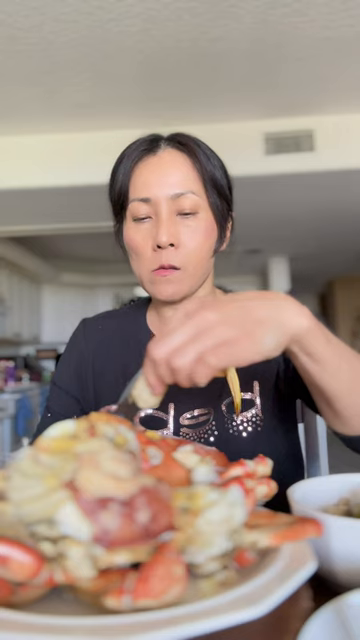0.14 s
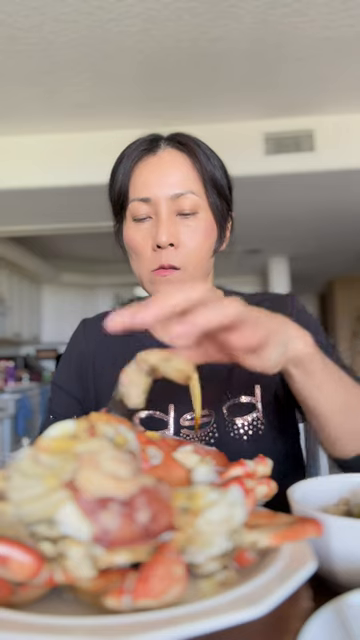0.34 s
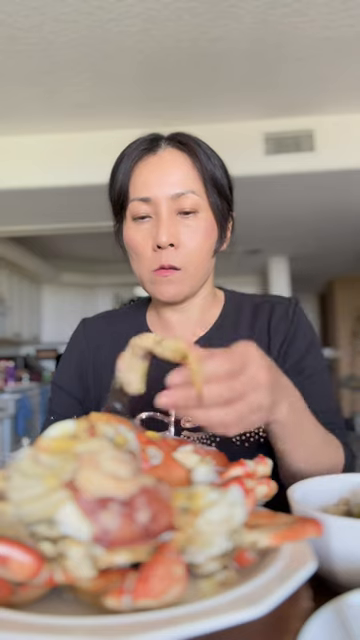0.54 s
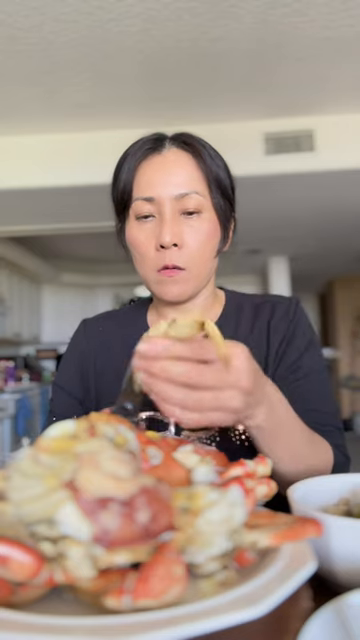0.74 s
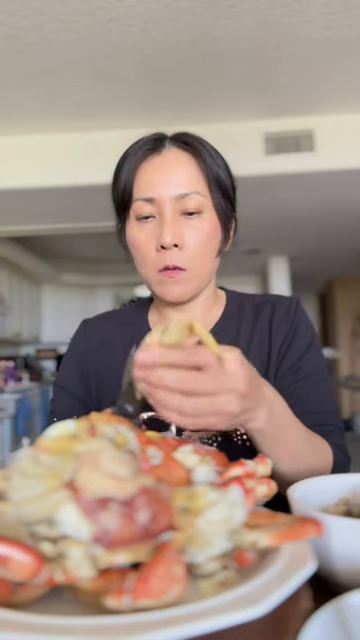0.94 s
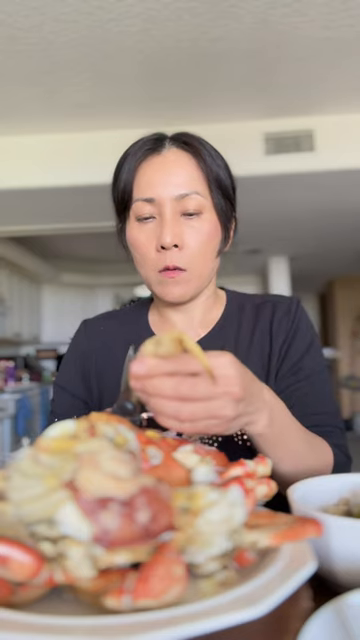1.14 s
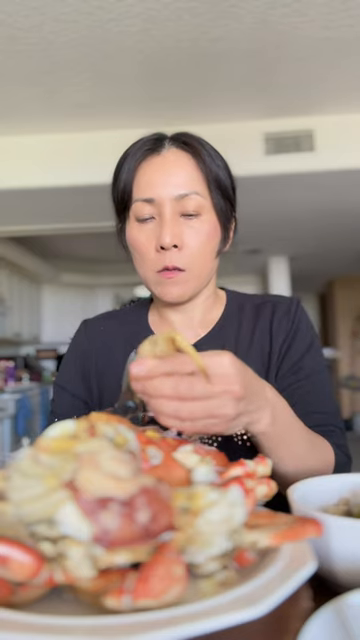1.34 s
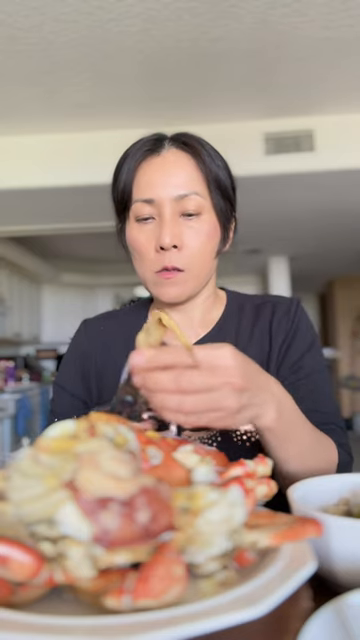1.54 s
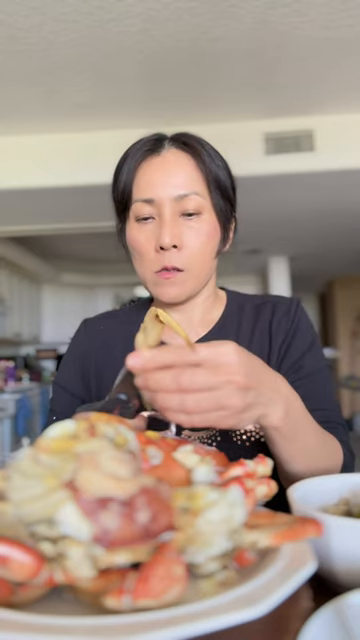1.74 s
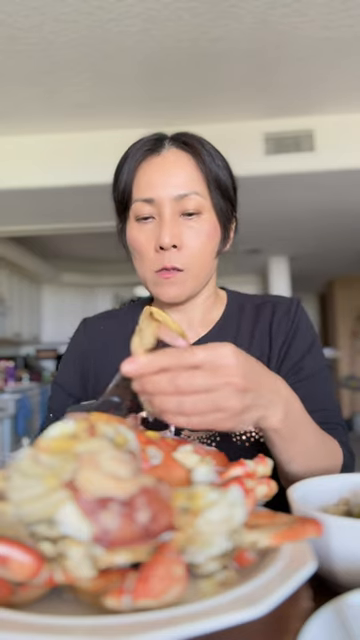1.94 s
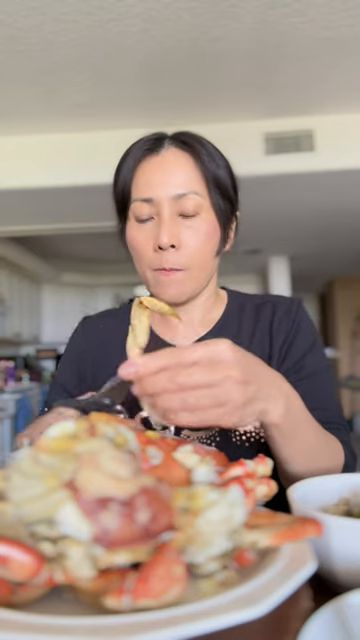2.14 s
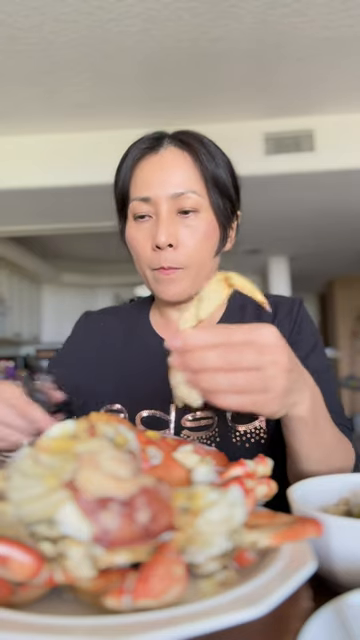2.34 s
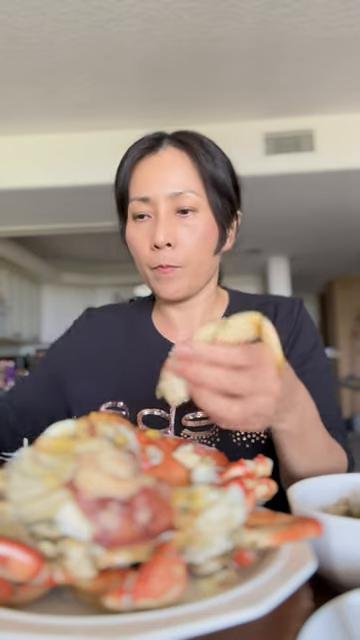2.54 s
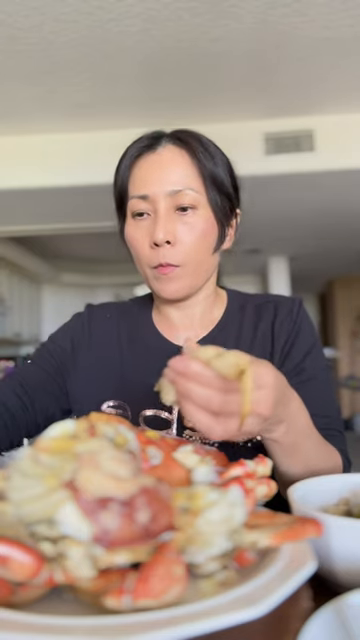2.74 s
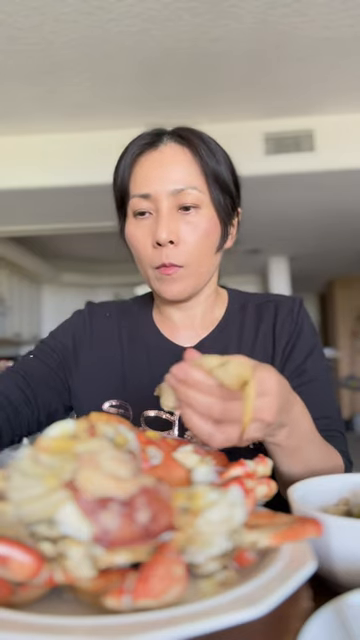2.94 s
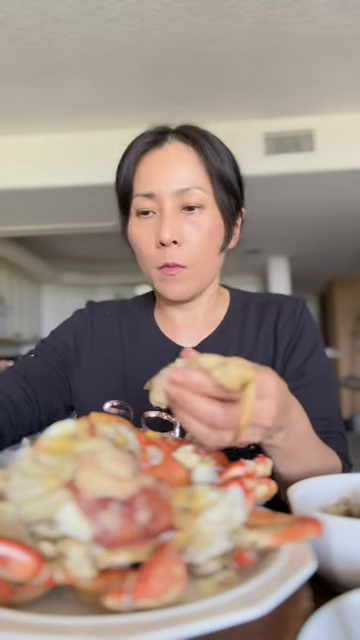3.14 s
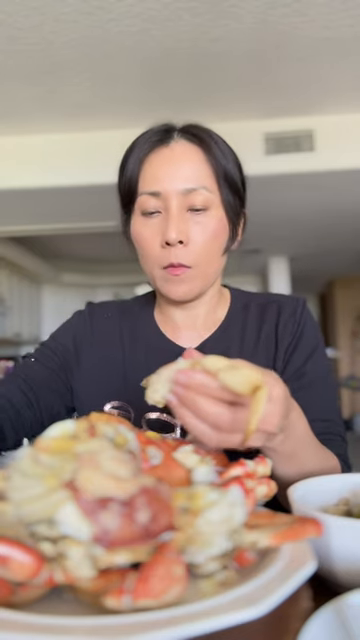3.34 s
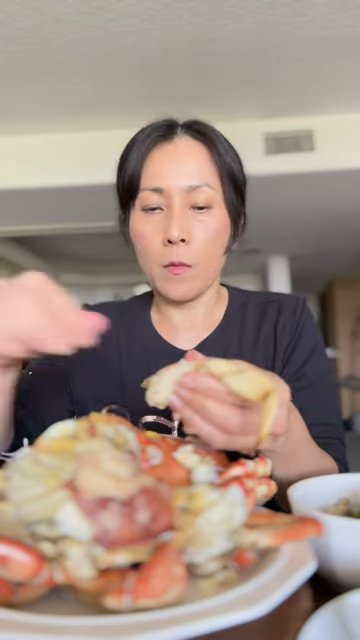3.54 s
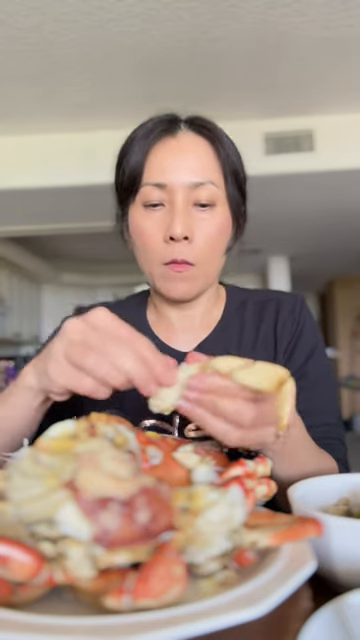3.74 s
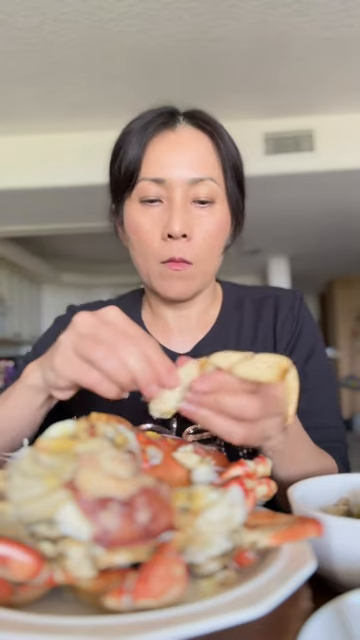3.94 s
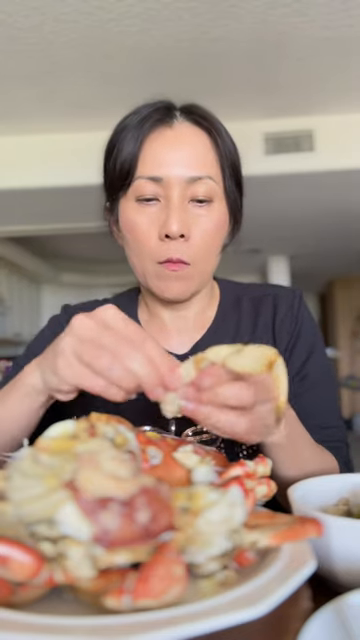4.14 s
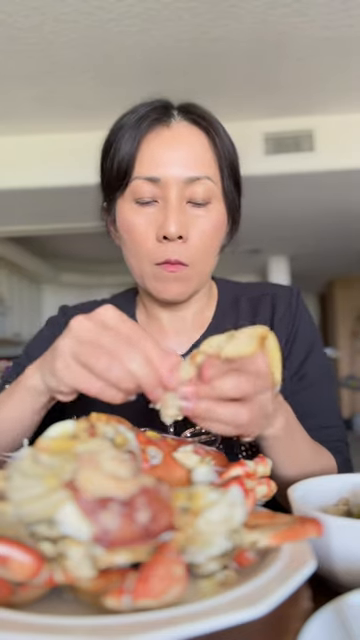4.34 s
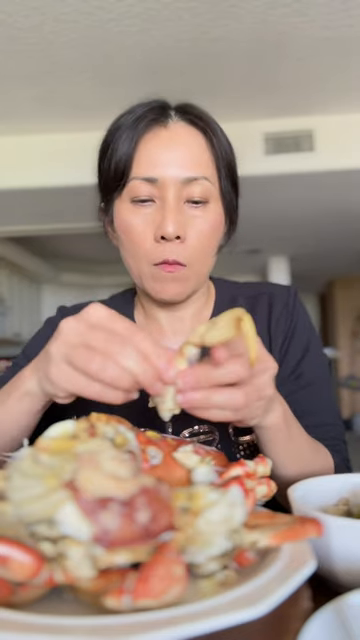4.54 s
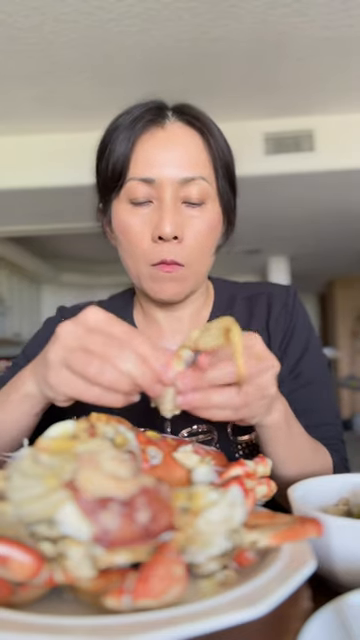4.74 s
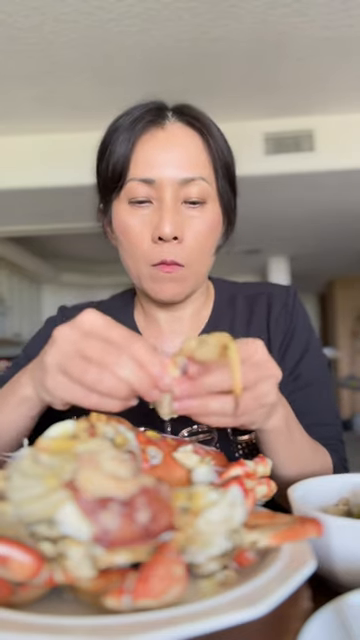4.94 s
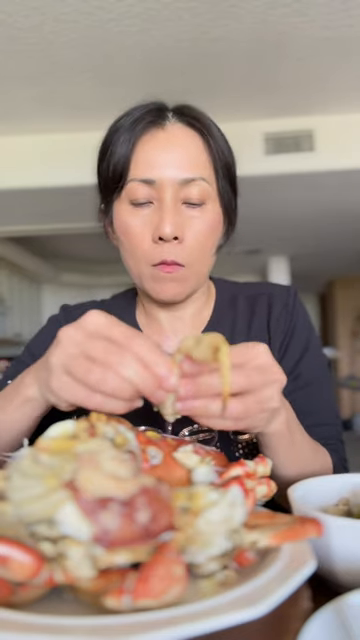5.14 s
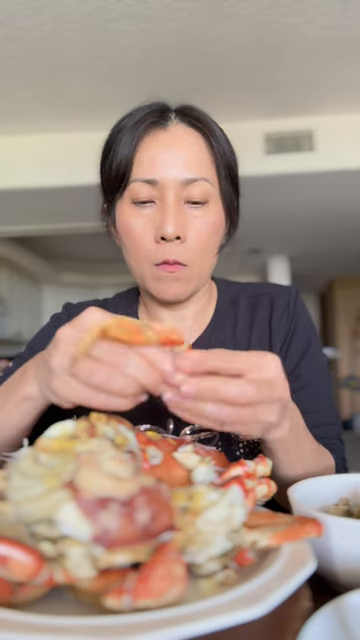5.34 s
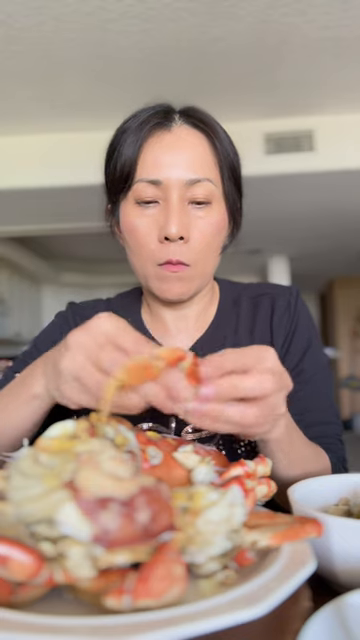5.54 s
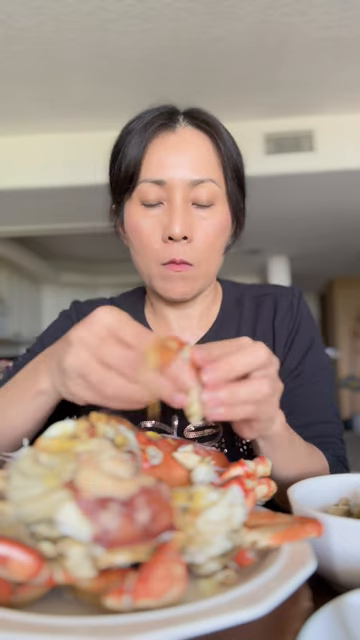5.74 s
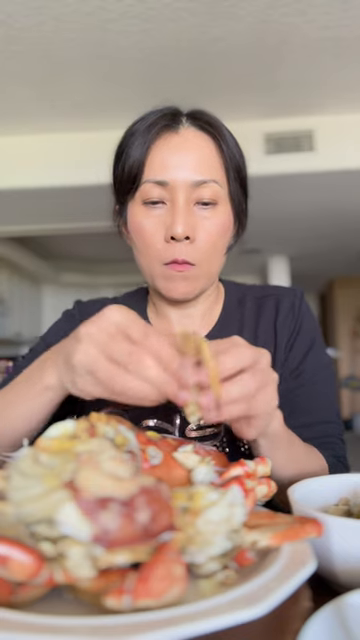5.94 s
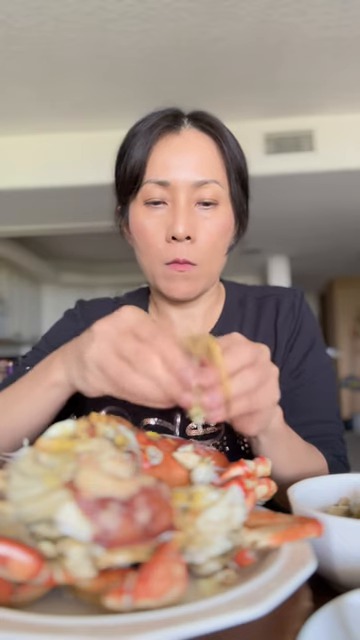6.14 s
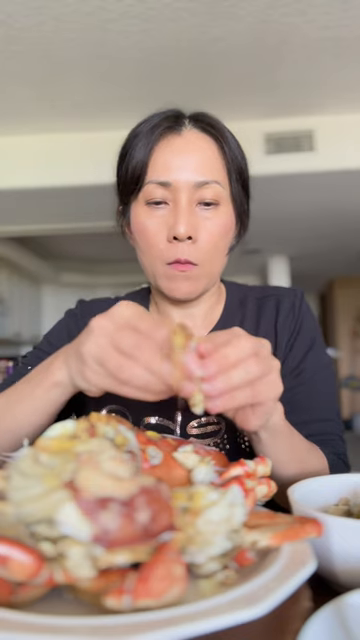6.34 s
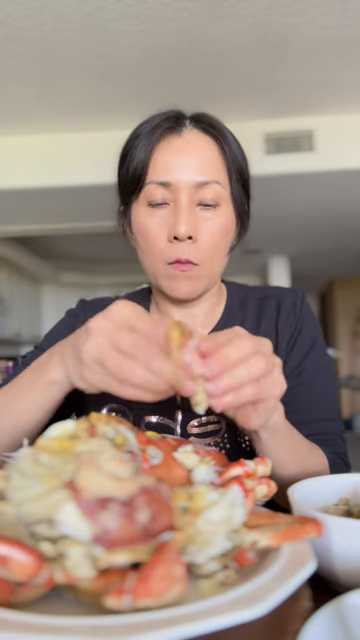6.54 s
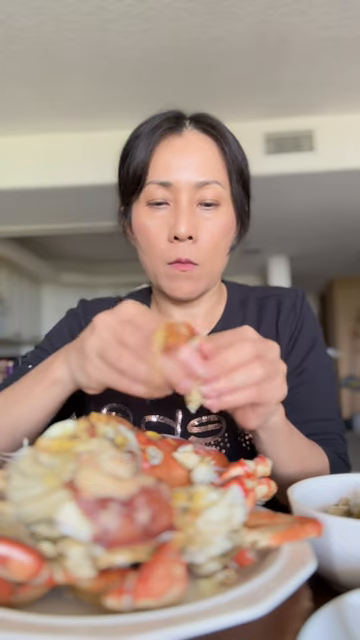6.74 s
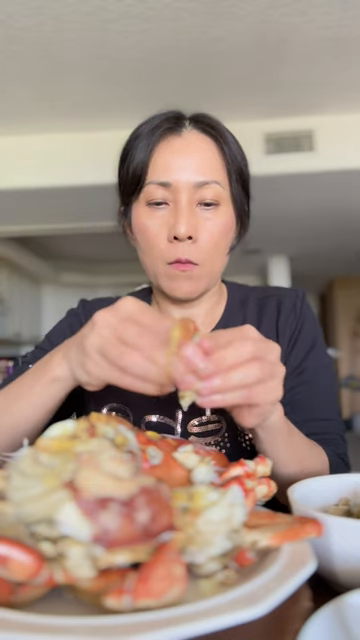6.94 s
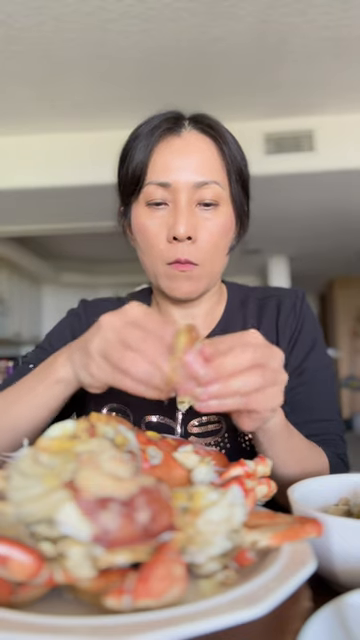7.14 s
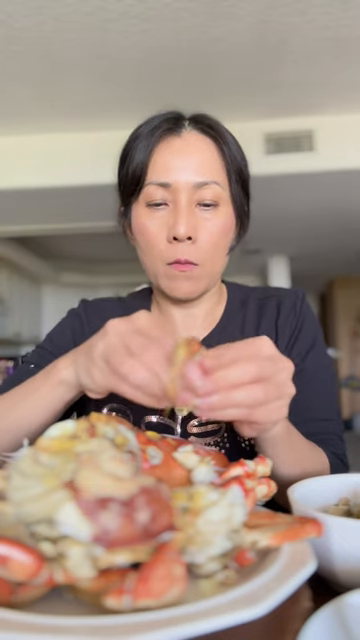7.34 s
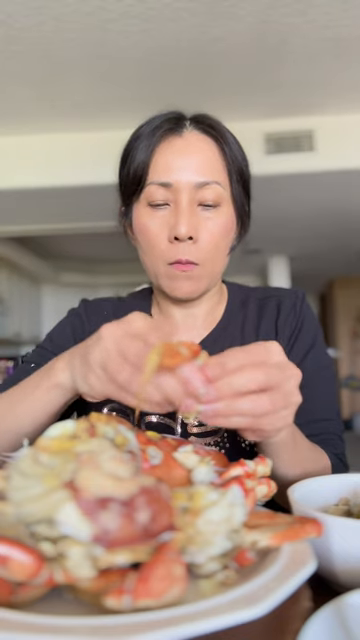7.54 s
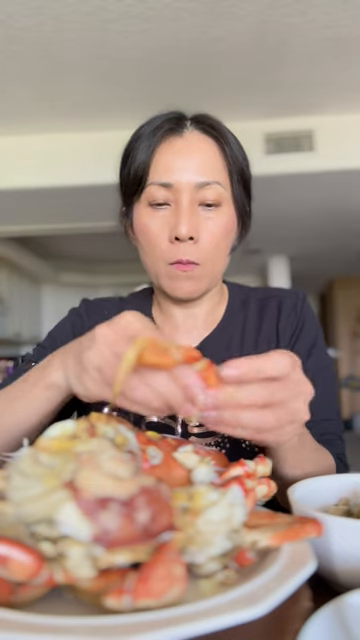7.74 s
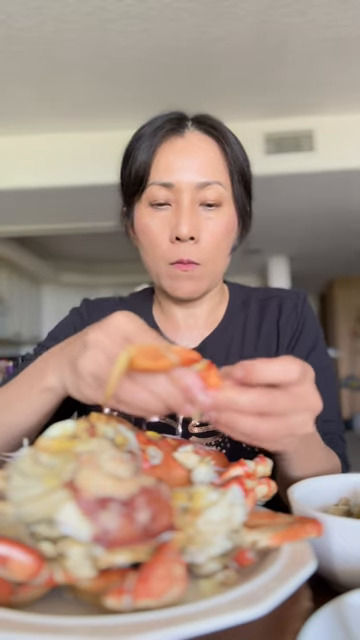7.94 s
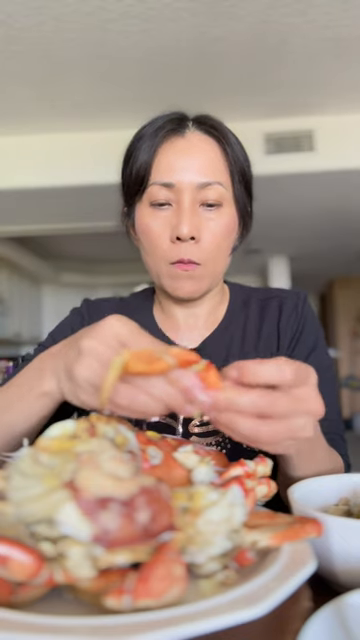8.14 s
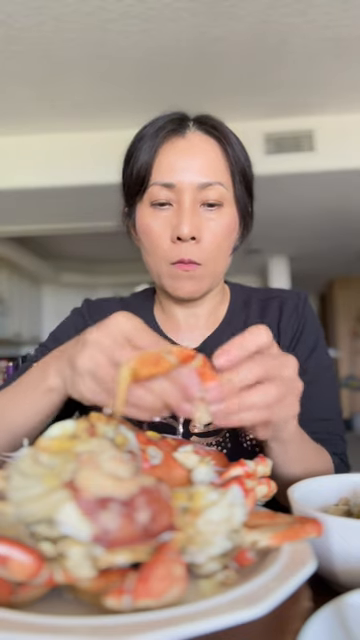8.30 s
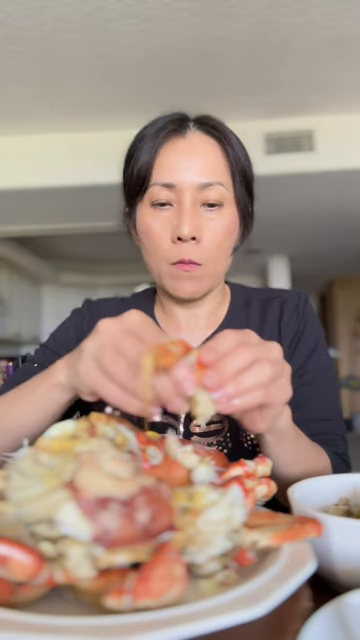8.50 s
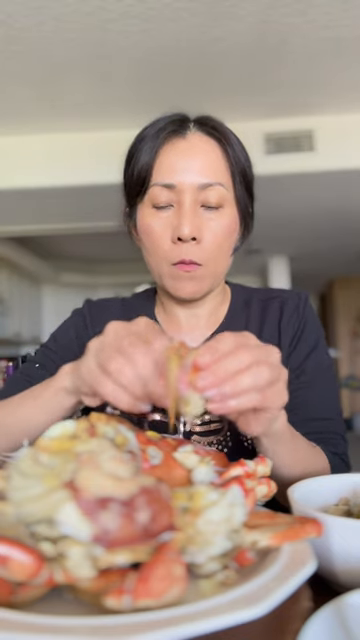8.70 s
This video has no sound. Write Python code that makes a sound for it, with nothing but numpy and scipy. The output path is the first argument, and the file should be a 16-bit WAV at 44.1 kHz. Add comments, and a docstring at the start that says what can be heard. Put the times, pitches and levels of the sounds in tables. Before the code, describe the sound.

Close to the microphone, hands break a crab leg in short, brittle snaps, with faint wet rubbing of fingers on the shell. About three seconds in, steel kitchen shears are laid on a wooden table with two ringing clatters. The cracking resumes, with two louder clusters of snaps and small crackles between them. The room is a quiet home with a low hush and a faint, distant fridge hum.

```python
"""A dining table in a quiet home, close to a phone: hands crack a crab leg and pull it apart.
Each brittle fracture is a short noise burst, coloured by the piece of shell it frees; sliding
fingers add friction noise and faint crackle. Steel kitchen shears are laid down twice at the left,
and each bounce excites the modes of the blades and the wooden table. The room reverberates
briefly, and a fridge hums far off under its hush."""
import sys
import numpy as np
from scipy import signal
from scipy.fft import rfft, irfft
from scipy.io import wavfile
from scipy.ndimage import uniform_filter1d

SR = 44100
rng = np.random.default_rng(int(sys.argv[2]) if len(sys.argv) > 2 else 0)


def to_wav(s):
    """Save 16-bit WAV."""
    ch = np.atleast_2d(s).T  # columns
    pcm = np.round(np.clip(ch, -1, 1) * 32767)  # PCM
    wavfile.write(sys.argv[1], SR, pcm.astype(np.int16))


N = 391166

# spectrum of the room's hush: (frequency [Hz], relative density [dB])
HUSH_SPECTRUM = [(12, -36.5), (20, -11.5), (53, 1.5), (143, -3.5), (361, -14), (492, -22.5), (772, -19.5),
                 (913, -23), (1470, -36), (2890, -34), (3720, -34), (5500, -43.5), (9000, -46),
                 (13500, -45), (16500, -59)]
# likeness of left and right in far sound: (frequency [Hz], coherence [0-1])
COHERENCE = [(30, 1), (60, .95), (130, .88), (290, .8), (640, .6), (1400, .15), (3000, .25), (15000, .1)]
# partials of the fridge: (frequency [Hz], mean level [dB])
FRIDGE_PARTIALS = [(59.2, -66), (118.4, -70.5), (226.1, -78), (769.8, -84), (1066, -91), (1184, -92.5)]
# fingers sliding on wet shell: (time [s], level [dB], relative treble [dB], duration [s])
SLIDES = [(-0.003, -58.5, 27, .14), (0.169, -64.5, 4, .15), (0.286, -71.5, -14, 0.12),
          (0.645, -70, 0.5, 0.1), (.747, -75.5, -5, 0.092), (0.931, -68.5, 2, 0.06),
          (1.289, -77.5, 12, 0.045), (1.402, -59.5, 4, 0.039), (1.562, -57.5, -4, 0.06),
          (1.821, -63, 5.5, 0.072), (2.178, -67.5, -10.5, 0.096), (2.476, -76, -12, 0.072),
          (2.732, -76, -1.5, 0.054), (3.869, -78.5, -2.5, 0.087), (3.988, -78, -13.5, 0.036),
          (4.066, -81, -6, 0.09), (4.209, -81.5, -3, 0.05), (4.371, -85.5, -6, 0.043),
          (4.696, -63.5, -22, 0.05), (5.196, -64.5, 1, 0.12), (5.477, -81, -17, 0.066),
          (5.584, -95, -17, .12), (5.855, -86, -10.5, 0.16), (6.018, -88, -14.5, .1),
          (6.144, -62.5, 6.5, 0.034), (6.68, -76, -12, 0.032), (6.773, -72.5, -8, 0.063),
          (7.187, -74, -16.5, 0.086), (7.294, -46.5, -25, 0.12), (7.629, -53, -25, .072),
          (7.91, -86.5, 5, .05), (7.998, -95, 1, .044), (8.25, -77.5, -19.5, 0.026),
          (8.515, -67, -21, 0.044), (8.61, -69.5, -2, 0.041), (8.754, -71, -6, 0.078)]
# spectrum of the rubbing: (frequency [Hz], relative density [dB])
FRICTION_SPECTRUM = [(800, -25), (2000, -5), (3700, 0), (6000, -5), (8000, -11), (11000, -11), (16000, -14)]
# distinct shell fractures:
# (time [s], level [dB], resonance [Hz], relative treble [dB], relative body [dB], T60 [s])
FRACTURES = [(0.0144, -33.5, 5250, 1, -25, 0.014), (0.0328, -31.5, 5000, 10.5, -30, 0.011),
             (0.0403, -36, 5670, -36, -31, 0.0076), (0.0444, -33, 5600, -22, -20, 0.03),
             (0.1042, -41.5, 4800, 7, -33, 0.029), (0.1261, -44, 5410, 8, -22, 0.012),
             (0.1531, -24.5, 5250, 4, -19.5, 0.022), (0.2074, -24, 3780, 5.5, -17.5, 0.03),
             (0.2154, -17, 3370, -7.5, -21.5, 0.014), (0.2234, -28.5, 2430, -41, -29, 0.0045),
             (0.6419, -40.5, 4150, -25, -11, 0.015), (0.6664, -58, 3980, -14, -20, 0.01),
             (0.7103, -50.5, 2680, -20, -7, 0.01), (0.7652, -45.5, 2130, -21, -13, 0.0081),
             (0.7984, -53.5, 5030, -29, -7, 0.011), (0.9258, -51, 2200, -17, -16, 0.01),
             (0.9537, -47.5, 2100, -25, -22, 0.0089), (1.2446, -56, 5340, 10, -23, 0.013),
             (1.2989, -40.5, 5400, 1, -37, 0.0072), (1.4142, -41.5, 2970, 11.5, -9, 0.021),
             (1.4294, -53, 2780, 8, -9, 0.01), (1.4591, -24.5, 2310, 6, -12.5, 0.024),
             (1.4894, -38, 2720, 3, -31, 0.01), (1.5703, -36.5, 4830, 3, -22, 0.012),
             (1.5938, -28, 2310, 3.5, -13, 0.018), (1.6944, -44.5, 4060, 5, -19, 0.01),
             (1.707, -43, 2300, -26, -35, 0.015), (1.8327, -37.5, 2270, 3, -16, 0.026),
             (1.8494, -39.5, 2440, -36, -12, 0.013), (1.8876, -47, 2350, 9, -27, 0.017),
             (2.0173, -43.5, 4130, 1, -43, 0.01), (2.1311, -51, 4170, -11, -16, 0.022),
             (2.1595, -25, 4700, -6, -21, 0.013), (2.2383, -43.5, 2430, 3, -18.5, 0.0079),
             (2.7422, -62.5, 3515, -12, -10.5, 0.01), (3.5987, -55, 3910, -22, -13, 0.011),
             (4.088, -55, 3750, -12, -19, 0.008), (4.1135, -50, 3030, 4, -29.5, 0.0094),
             (4.143, -52.5, 3080, -25, -32, 0.012), (4.1514, -51, 5470, -26, -31, 0.013),
             (4.4343, -44.5, 3430, -4, -43, 0.014), (4.7177, -27.5, 4100, -8, -18.5, 0.014),
             (4.8633, -38.5, 4120, 0, -17.5, 0.012), (5.0335, -54.5, 4100, 1, -23, 0.01),
             (5.0913, -31.5, 3300, 2.5, -20, 0.016), (5.1094, -48, 4450, -1, -13, 0.0083),
             (5.1228, -27, 3090, 4, -18.5, 0.015), (5.1432, -19.5, 4180, 2.5, -29, 0.012),
             (5.1624, -37, 4620, -21, -37, 0.01), (5.2284, -66, 4080, 7, -12, 0.01),
             (5.2594, -7.5, 5440, 0, -22, 0.019), (5.2794, -26, 4760, 6, -18, 0.01),
             (5.3193, -28, 4040, -35, -25, 0.013), (5.5156, -52, 3790, -31, -12, 0.0079),
             (5.5298, -62.5, 4540, -27, -5, 0.01), (6.1619, -36.5, 3930, 4, -15, 0.015),
             (6.1854, -50.5, 3940, -28, -8, 0.0088), (6.4098, -53.5, 3880, -29.5, -21, 0.019),
             (6.5545, -54.5, 3910, -22, -23, 0.016), (6.6917, -54, 3660, -17, -5, 0.013),
             (6.791, -52.5, 4000, -25.5, -9, 0.011), (6.8324, -53.5, 4040, -29, -13.5, 0.011),
             (7.1327, -64, 3910, -28, -12, 0.01), (7.1786, -61, 3920, 6, -17, 0.0089),
             (7.2115, -29.5, 3970, 5, -35, 0.013), (7.2434, -41, 4040, -22, -36, 0.015),
             (7.2549, -29, 3930, 9, -50, 0.015), (7.2744, -49, 4820, -17, -38, 0.01),
             (7.2918, -43, 3700, 2, -31, 0.011), (7.3183, -20, 3360, -0.5, -18, 0.025),
             (7.3362, -17, 3540, 2, -15.5, 0.014), (7.3404, -36, 3220, 16, -14, 0.012),
             (7.3711, -22, 2140, 6.5, -10, 0.013), (7.3976, -22, 3750, 5, -27, 0.0056),
             (7.5064, -50, 3570, -21, -20, 0.013), (7.6036, -43, 4530, -5, -26, 0.014),
             (7.6505, -12, 4120, 2, -27.5, 0.02), (7.6614, -24.5, 4940, 11, -51, 0.013),
             (7.6934, -28, 4400, 1, -36, 0.011), (7.7742, -41.5, 3560, 8.5, -33, 0.0073),
             (7.9264, -52.5, 4450, 5, -22, 0.012), (7.9977, -54, 4810, -2, -25, 0.0085),
             (8.0207, -54.5, 4210, 10, -18.5, 0.025), (8.2621, -52, 2610, -26, -16.5, 0.014),
             (8.532, -32.5, 2270, -10, -3.5, 0.014), (8.5414, -36.5, 3520, -45, -21, 0.0052),
             (8.6168, -40, 2430, -30, -13, 0.013), (8.6314, -54.5, 2480, -29, 5, 0.011),
             (8.7735, -46, 3840, -21, -23, 0.011)]
# shears striking the table: (time [s], steel level [dB], relative treble [dB], knock level [dB])
BOUNCES = [(2.9025, -7.5, -10.5, -23.5), (2.9132, -11.5, -23.5, -28.5), (2.9402, -13.5, -13.5, -34),
           (2.9547, -13, -6.5, -23), (2.9749, -15, -5.5, -32), (2.9918, -19, -15.5, -25),
           (3.0114, -32.5, -9, -35), (3.265, -6.5, -8.5, -18.5), (3.271, -13.5, -17, -20),
           (3.2869, -12.5, -12, -19.5), (3.3005, -18.5, 0, -37.5), (3.3122, -24.5, -15.5, -31.5),
           (3.335, -43, -20, -59)]
# layings-down: (start [s], blade T60 factor [ratio], thud over knock [dB], time of rest [s])
LAYINGS = [(2.9, 0.56, -2.5, 3.02), (3.26, .2, 0, 3.32)]
# modes of the shears: (frequency [Hz], relative level [dB], base T60 [s])
STEEL_MODES = [(2480, 0, .16), (2557, -9, .13), (3531, -13, .16), (3610, -2, .17), (3911, -9, .23),
               (4010, -17, .13), (4300, -25, .13), (4953, -24, .12), (5745, -7, .14), (6930, -10, .11),
               (8866, -20, .1), (9512, -16, .11), (10170, -17, .1), (10960, -23, .1), (11845, -17, .12),
               (12770, -19, .1), (13520, -19, .12), (15500, -29, .1)]
# modes of the table: (frequency [Hz], relative level [dB], base T60 [s])
WOOD_MODES = [(58, -20, .3), (85, -17, .25), (118, -6, .16), (171, 4, .11), (235, -4, .09), (309, -3, .09),
              (469, -2, .1), (575, -6, .07), (632, -5, .07), (772, -11, .06)]
# reverberant tail: (frequency [Hz], relative level [dB], T60 [s])
ROOM_BANDS = [(250, -3, .35), (660, -1, .24), (1740, -2, .21), (4000, 0, .25), (7500, -4, .2),
              (11000, -6, .18), (15000, -6, .16)]
# the phone's crossfeed: (frequency [Hz], share of the right channel drawn from the left [0-1])
CROSSFEED = [(4500, .02), (5600, .4), (7500, .8), (8500, .8), (9600, .75), (11500, .95), (13800, .75),
             (15500, .93)]
# the phone's phase shift: (frequency [Hz], lead of the right channel [rad])
PHASE_LEAD = [(2300, -.2), (3200, 1.4), (3900, .1), (4800, 1.5), (5300, .1), (5600, -1.8), (6300, -1.6),
              (7200, -2.9), (8600, -3.3), (10500, -5.1), (11700, -6.3), (13000, -7), (15000, -9.1),
              (16000, -9.4)]

BIN_HZ = np.fft.rfftfreq(N, 1 / SR)


def gain_of(db):
    """Amplitude ratio for a level in decibels."""
    return 10 ** (np.asarray(db) / 20)


def unit_rms(x):
    """Normalises to an rms of 1."""
    return x / np.sqrt(np.mean(abs(x) ** 2) + 1e-20)


def unit_peak(x):
    """Normalises to a peak of 1."""
    return x / abs(x).max()


def curve_at(points, hz):
    """Interpolates a table on a logarithmic frequency axis."""
    f, value = np.transpose(points)
    return np.interp(np.log(hz + 1), np.log(f + 1), value)


def add(mix, start_s, sound):
    """Superposes a sound on the mix."""
    part = mix[round(start_s * SR):][:len(sound)]
    part += sound[:len(part)]


def band(burst, low_hz, high_hz):
    """Band-pass filters a burst, to a peak of 1."""
    sos = signal.butter(3, [low_hz, high_hz], "band", fs=SR, output="sos")
    return unit_peak(signal.sosfilt(sos, burst))


def drift(top_hz):
    """Slow fluctuation of rms 1: a sum of sinusoids in random phase."""
    t = np.arange(0, N, 256) / SR
    rates_hz = np.geomspace(top_hz / 20, top_hz, 16)
    waves = sum(np.sin(2 * np.pi * (f * t + rng.random())) / np.sqrt(f) for f in rates_hz)
    return np.interp(np.arange(N) / SR, t, unit_rms(waves))


def diffuse_pair(left, other, hz):
    """Partial coherence: two independent spectra blend into a stereo pair, alike in the bass."""
    coherence = curve_at(COHERENCE, hz)
    return np.array([left, coherence * left + np.sqrt(1 - coherence ** 2) * other])


def room_hush():
    """Diffuse background noise, strongest in the bass, its level wandering slightly."""
    spectra = diffuse_pair(*rfft(rng.standard_normal((2, N))), BIN_HZ)
    air = irfft(spectra * gain_of(curve_at(HUSH_SPECTRUM, BIN_HZ)), N)
    return gain_of(-62.5 + 1.6 * drift(8)) * unit_rms(air)


def fridge_hum():
    """A line spectrum whose partials waver by slow amplitude and phase modulation."""
    t, hum = np.arange(N) / SR, np.zeros(N)
    for hz, db in FRIDGE_PARTIALS:
        amplitude = np.sqrt(2) * gain_of(db + 4 * drift(4))
        hum += amplitude * np.sin(2 * np.pi * hz * t + hz / 900 * drift(11))
    return hum


def finger_friction(idle_db=-89, ticks_per_s=150, crossover_hz=7000):
    """Sliding friction: broadband noise, strewn with tiny wet ticks, swells with each slide."""
    ticks = gain_of(1.2 * np.minimum(rng.exponential(1, N), 3)) * (rng.random(N) < ticks_per_s / SR)
    ticks = signal.lfilter([1], [1, -.97], ticks)  # each lasts about a millisecond
    noise = rng.standard_normal(N) * (1 + 0.38 * unit_rms(ticks))
    rub = rfft(noise) * gain_of(curve_at(FRICTION_SPECTRUM, BIN_HZ))
    lowpass = 1 / (1 + (BIN_HZ / crossover_hz) ** 4)
    dull = np.full(N, gain_of(idle_db))  # the hands are never quite still
    bright = np.full(N, gain_of(idle_db - 8))
    for start_s, db, treble_db, length_s in SLIDES:
        swell = signal.windows.tukey(round(length_s * SR), .6)
        add(dull, start_s, gain_of(db) * swell)
        add(bright, start_s, gain_of(db + treble_db) * swell)
    return dull * unit_rms(irfft(rub * lowpass, N)) + bright * unit_rms(irfft(rub * (1 - lowpass), N))


def microfractures(per_slide=2, body_db=-18, t60=0.0036):
    """Rows of faint fractures at random moments of each slide, louder under a firmer one."""
    start_s, slide_db, treble_db, length_s = np.repeat(SLIDES, per_slide, axis=0).T
    when, size, pitch = rng.random((len(start_s), 3)).T
    times_s = np.maximum(start_s + when * length_s, .01)
    level_db = -61.5 + 0.35 * (slide_db + 67) + 3 * (2 * size - 1)
    hz = 3000 + pitch * (5868 - 3000)
    return [(*row, body_db, t60) for row in zip(times_s, level_db, hz, treble_db)]


def shell_cracks(fractures, rise_s=0.00021):
    """Brittle fracture: a quick run of tiny breaks excites the resonance of the freed piece."""
    out, t = np.zeros(N), np.arange(1024) / SR
    for start_s, db, hz, treble_db, body_db, t60 in fractures:
        noise, roughness = rng.standard_normal((2, len(t)))
        breaks = noise * gain_of(0.3 * roughness - 60 * t / t60) * np.minimum(t / rise_s, 1)
        dull_db = min(treble_db, 0)
        width = max(1.45 + dull_db / 120, 1.18)  # dull pops are pitched, bright snaps are wide
        piece = band(breaks, hz / width, hz * width)
        snap = unit_peak(piece + gain_of(.12 * dull_db) * band(breaks, 1900, 6500))
        treble = gain_of(treble_db) * (band(breaks, 6500, 16200) + band(breaks, 6500, 11500)) / 2
        body = gain_of(body_db) * band(breaks, 420, 1300)
        add(out, start_s - .0005, gain_of(db) * (snap + treble + body))
    return out


def struck_modes(modes, t60_factor, coupling, rise_s=.0015):
    """Damped free vibration, a row per mode; the point of impact sets each one's strength and sign."""
    hz, db, t60 = np.transpose(modes)[:, :, None]
    t = np.arange(SR // 4) / SR
    envelope = gain_of(db + 3.1 * coupling[:len(hz), None] - 60 * t / (t60 * t60_factor))
    phase = np.pi * (coupling[-len(hz):, None] > 0)
    return envelope * np.sin(2 * np.pi * hz * t + phase) * np.minimum(t / rise_s, 1)


def bouncing_shears(rest_db_per_s=-600, right_delay_s=0.00024):
    """Impact excitation: at each bounce the blades ring, the plastic handles smack, the table thuds."""
    steel, wood = np.zeros(N), np.zeros(N)
    burst_t, ring_t = np.arange(2048) / SR, np.arange(SR // 4) / SR
    is_treble = np.array(STEEL_MODES)[:, 0] > 4700
    for start_s, db, treble_db, knock_db in BOUNCES:
        noise = rng.standard_normal(len(burst_t))
        _, t60_factor, thud_db, rest_s = LAYINGS[int(start_s > LAYINGS[1][0])]
        # hand and table damp the blades, faster once they lie flat; the free ends ring on faintly
        settling = gain_of(rest_db_per_s * np.maximum(start_s + ring_t - rest_s, 0))
        blades = settling * struck_modes(STEEL_MODES, t60_factor, noise)
        blades += gain_of(-32) * struck_modes(STEEL_MODES, 1.6, noise)
        low, high = unit_peak(blades[~is_treble].sum(0)), unit_peak(blades[is_treble].sum(0))
        add(steel, start_s, gain_of(db) * (low + gain_of(treble_db) * high))
        smack = band(noise * np.exp(-burst_t / 0.011), 1800, 9000)
        add(steel, start_s, gain_of(knock_db - 4.5) * smack)
        knock = band(noise[::-1] * np.exp(-burst_t / 0.0088), 350, 2200)
        add(wood, start_s, gain_of(knock_db) * knock)
        thud = struck_modes(WOOD_MODES, 0.78, noise[100:], rise_s=0.0031).sum(0)
        add(wood, start_s, gain_of(knock_db + thud_db) * unit_peak(thud))
    steel *= 1 + .2 * unit_rms(uniform_filter1d(rng.standard_normal(N), 300))  # the loose pivot chatters
    delayed = np.roll(steel, round(right_delay_s * SR))  # longer path to the right microphone
    return np.array([steel + wood, delayed + wood])


def reverberation(source):
    """Reflections of random sign form a tail in which each band decays exponentially at its own rate."""
    size = SR // 2
    reflections = np.zeros((2, size))
    arrivals = np.arange(100, size - 10, 10) + rng.integers(0, 10, (2, (size - 101) // 10))
    np.put_along_axis(reflections, arrivals, rng.choice([-1., 1.], arrivals.shape), 1)
    hz, t, spectra = signal.stft(reflections, SR, nperseg=256)
    hz, bands = hz[:, None], np.array(ROOM_BANDS)
    decay_db = curve_at(bands[:, [0, 1]], hz) - 60 * t / curve_at(bands[:, [0, 2]], hz)
    tail = signal.istft(diffuse_pair(*spectra, hz) * gain_of(decay_db), SR, nperseg=256)[1]
    return signal.fftconvolve(source, tail / np.linalg.norm(tail[0]), axes=1)[:, :N]


def scene():
    """Superposition of the direct sounds, their reverberation and the background."""
    shell = shell_cracks(FRACTURES + microfractures()) + finger_friction()
    shears = bouncing_shears()
    tails = reverberation(gain_of(-8) * shell + gain_of(-6.5) * shears)
    return shell + shears + tails + room_hush() + fridge_hum()


def record(dry):
    """Crossfeed: the phone blends left treble into the right, shifts its phase, then band-limits both."""
    left, right = rfft(dry)
    share = curve_at(CROSSFEED, BIN_HZ)
    hz, lead_rad = np.transpose([(0.0085, 0.0069)] + PHASE_LEAD)  # nearly in phase at the lowest bass
    right = (share * left + (1 - share) * right) * np.exp(1j * np.interp(BIN_HZ, hz, lead_rad))
    pair = irfft(np.array([left, right]), N)
    lowpass = signal.firwin(511, cutoff=16550, window=("kaiser", 9), fs=SR)
    return signal.oaconvolve(pair, lowpass[None], "same")


dry = scene()
out = record(dry)
to_wav(out)
```